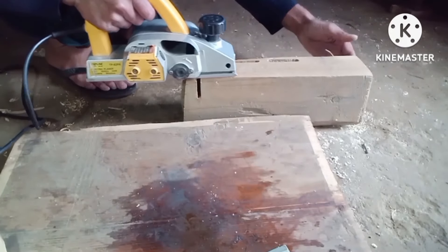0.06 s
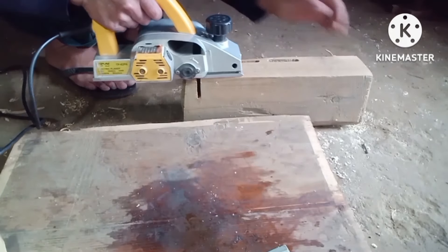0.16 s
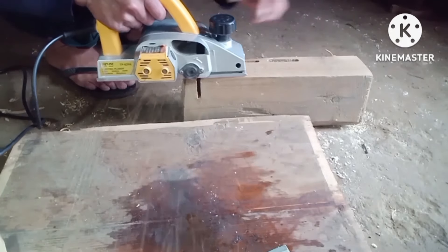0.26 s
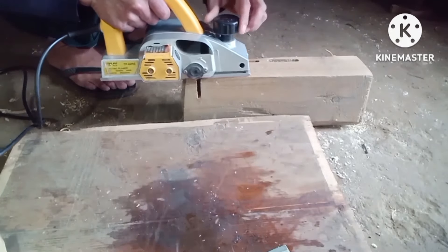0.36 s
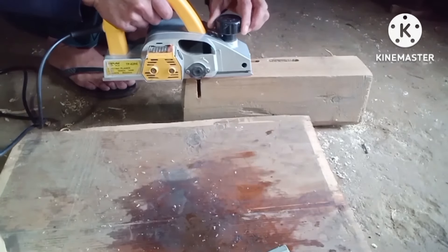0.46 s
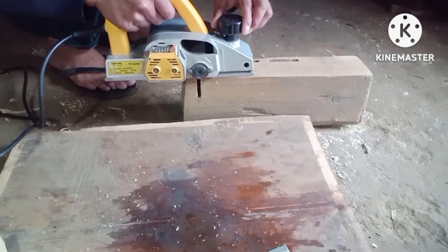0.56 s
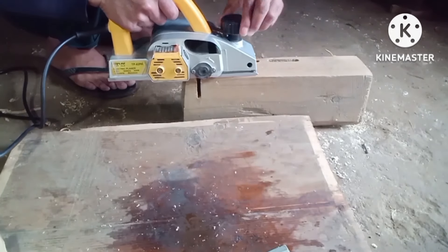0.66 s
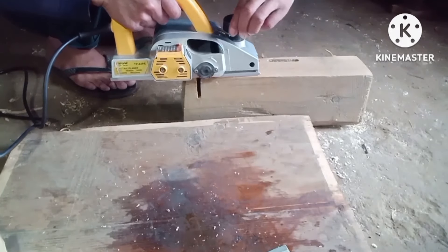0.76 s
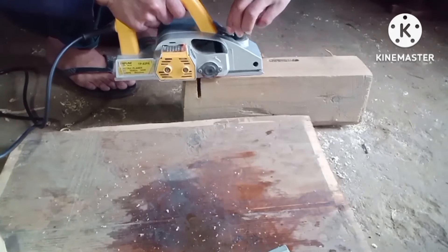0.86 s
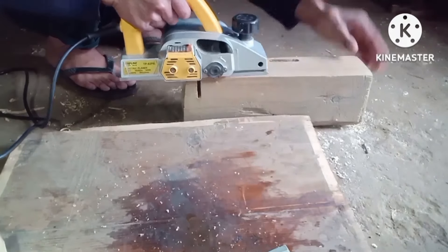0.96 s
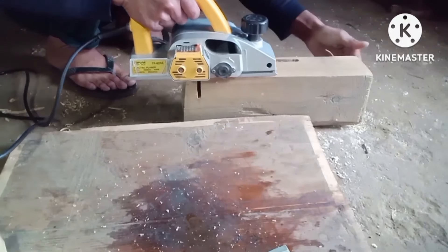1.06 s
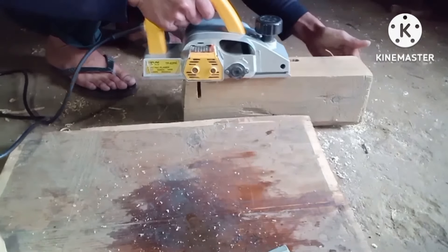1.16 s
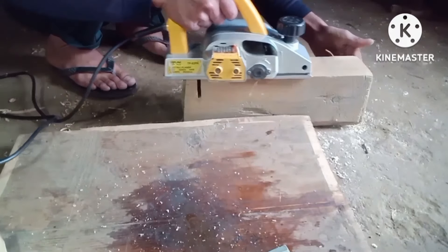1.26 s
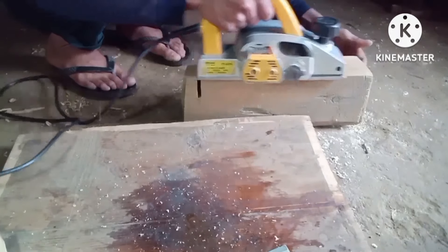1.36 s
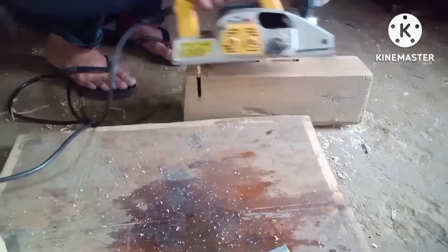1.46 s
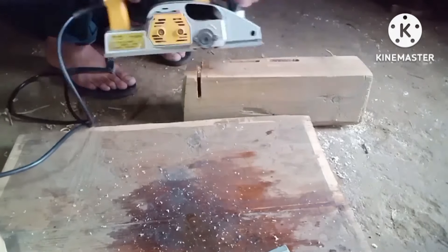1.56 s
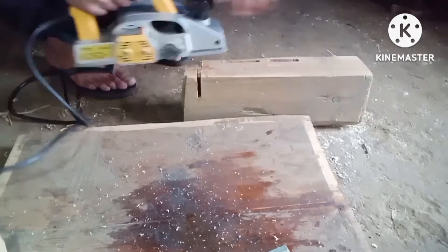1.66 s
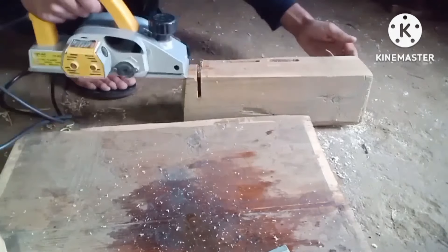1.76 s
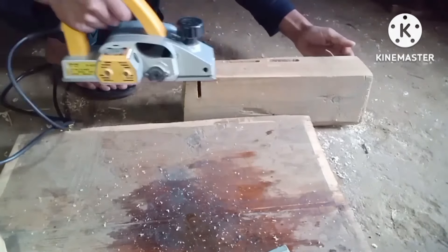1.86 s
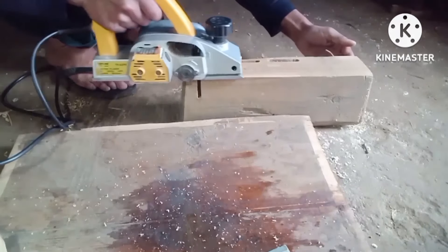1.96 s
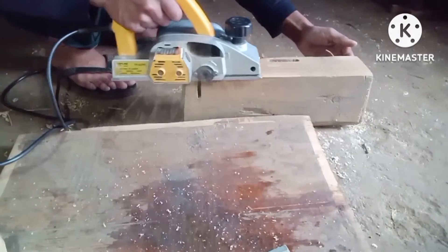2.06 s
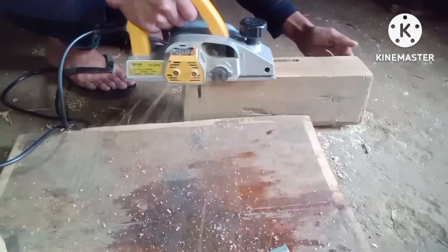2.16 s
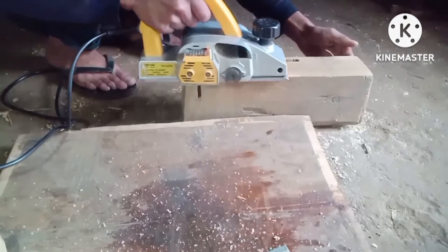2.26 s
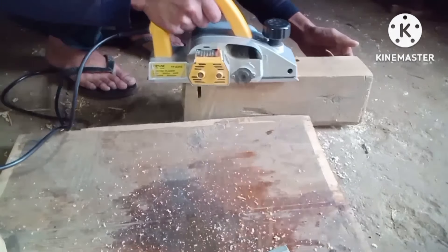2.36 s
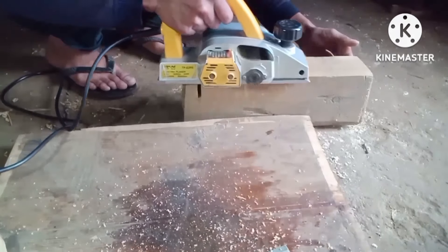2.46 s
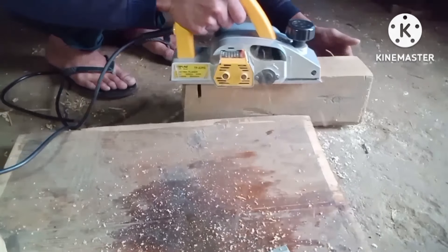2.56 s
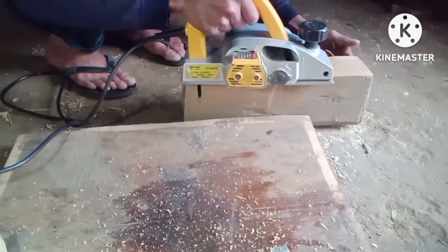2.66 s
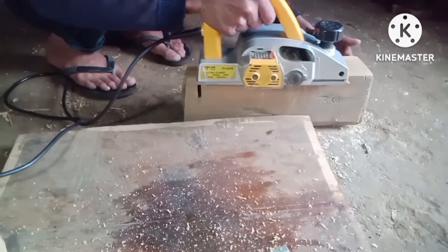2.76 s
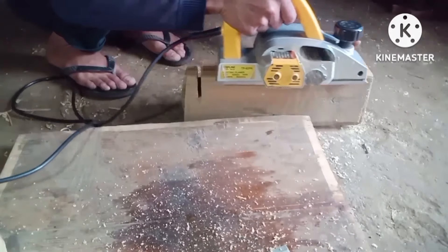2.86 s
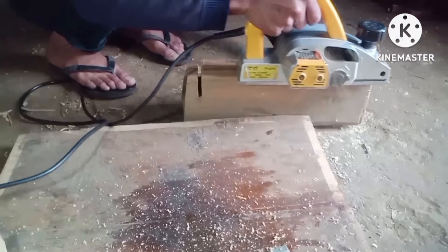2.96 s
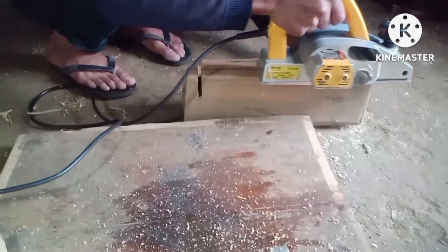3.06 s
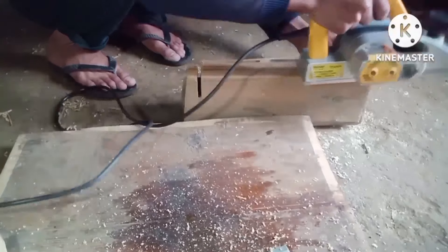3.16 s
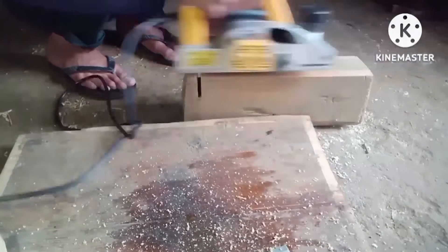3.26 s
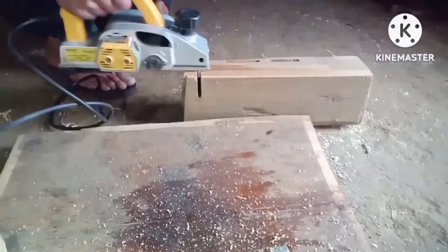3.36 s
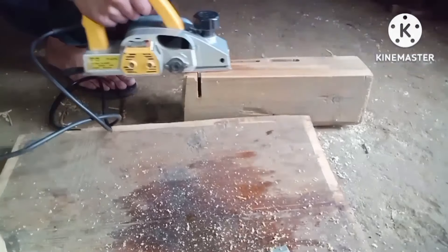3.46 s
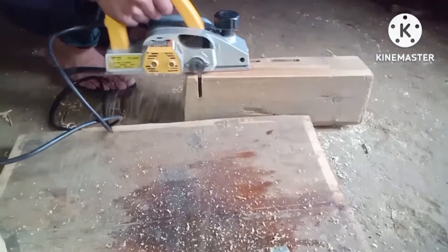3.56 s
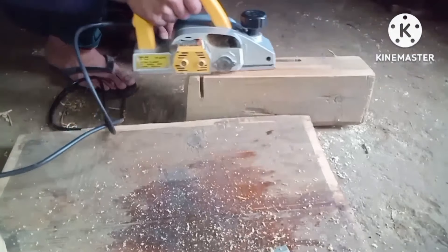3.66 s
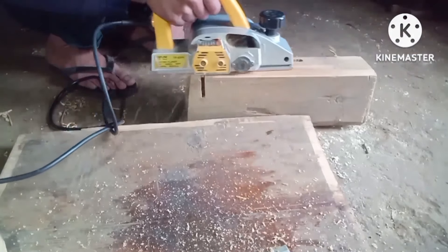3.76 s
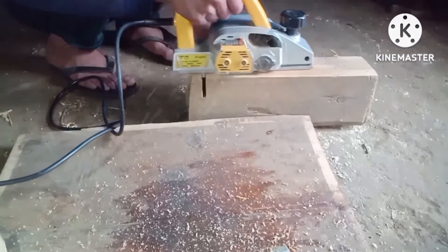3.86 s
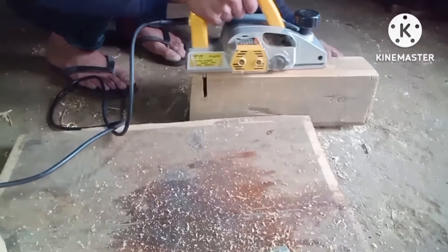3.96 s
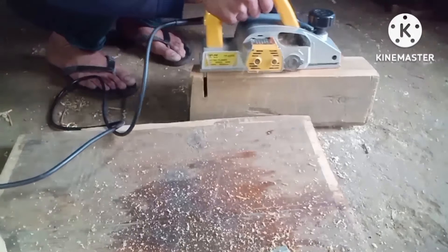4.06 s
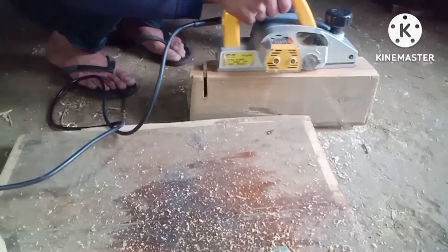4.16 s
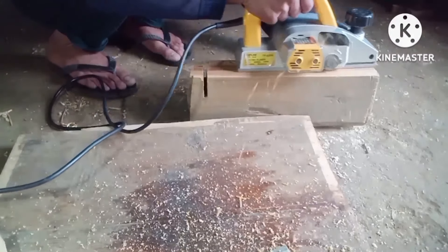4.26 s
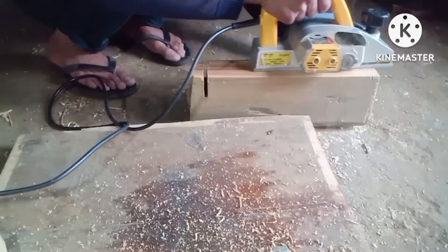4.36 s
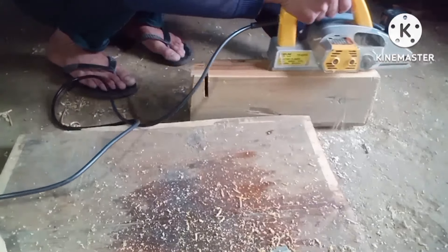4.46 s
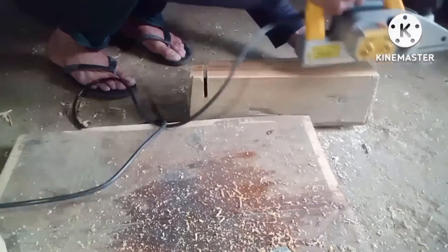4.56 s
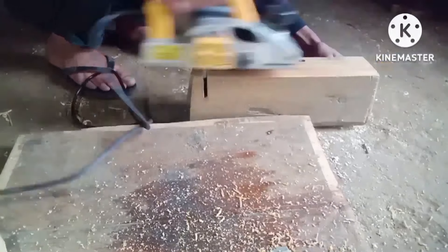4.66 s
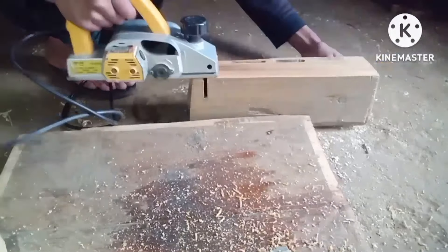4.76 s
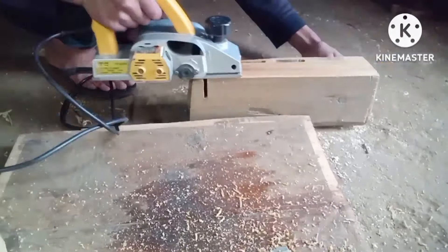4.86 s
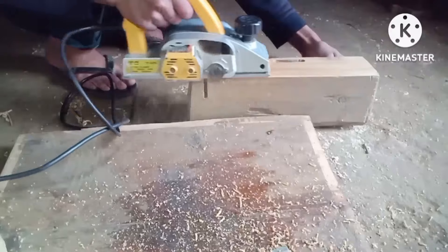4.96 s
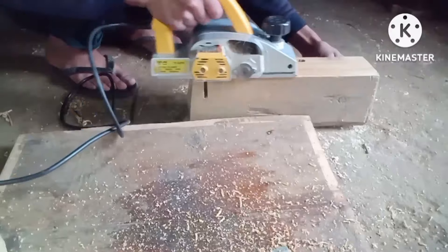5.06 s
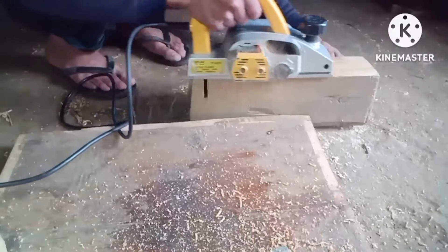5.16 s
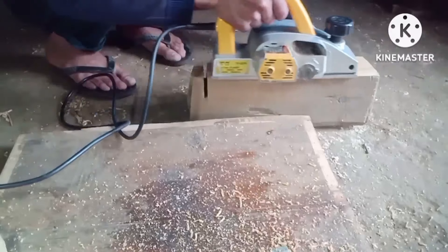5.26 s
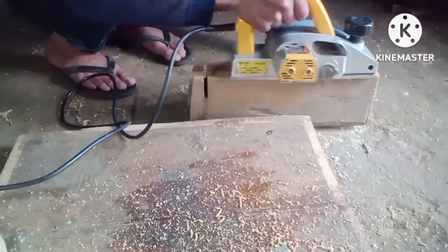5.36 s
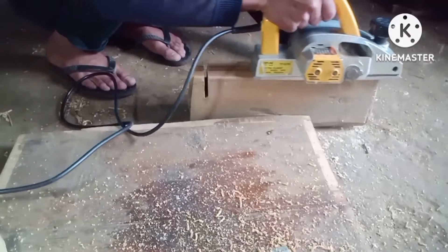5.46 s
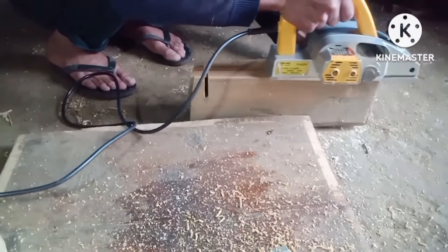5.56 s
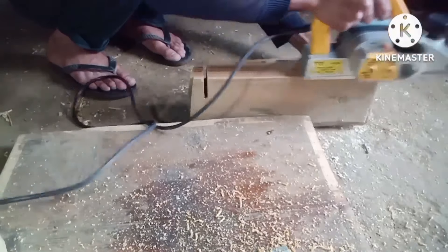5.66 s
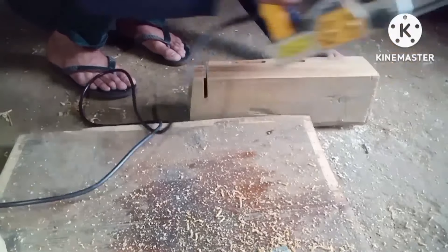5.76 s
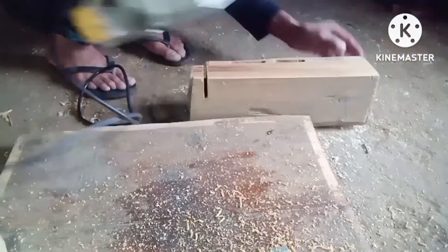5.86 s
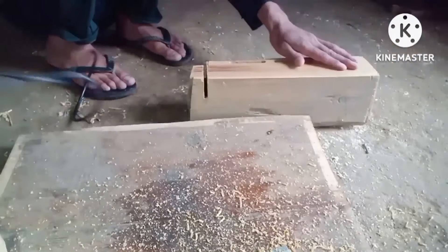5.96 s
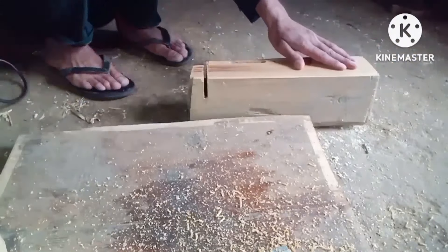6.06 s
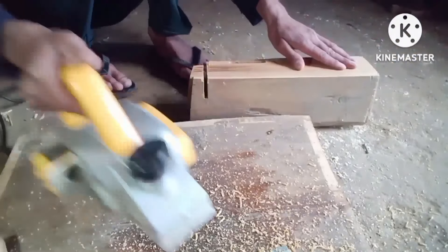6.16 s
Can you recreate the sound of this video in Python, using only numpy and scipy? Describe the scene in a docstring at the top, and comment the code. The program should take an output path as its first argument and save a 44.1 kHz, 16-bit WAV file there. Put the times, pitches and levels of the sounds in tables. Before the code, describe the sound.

In a small workshop, close to the microphone, an electric planer growls roughly at low speed, then switches suddenly to a loud high whine. Its blades chatter and rasp on a wooden block, the pitch sagging under load. It coasts down and spins up twice between passes, then dull chip knocks patter close by before a final coast-down. The sound is thin in the bass, with a short room reflection.

```python
"""Small workshop, close by: an electric hand planer shaves a wooden block. First a low growl; the scene then
changes abruptly to a high whine, which sags under the cut and coasts down three times. Tones are orders of the
motor shaft; wood, housing and fan noises are coloured noise tied to its turns. Blades chatter as they meet the
wood, then rasp; the block groans; chips knock near the microphone."""
import sys
import numpy as np
from scipy import signal
from scipy.fft import rfft, irfft, next_fast_len
from scipy.io import wavfile
from scipy.ndimage import uniform_filter1d, map_coordinates

SR = 44100
rng = np.random.default_rng(int(sys.argv[2]) if len(sys.argv) > 2 else 0)


def unload_audio(sound):
    """Save the sound as a 16-bit wav file, at the path given as the first command line argument."""
    columns = np.transpose(np.atleast_2d(sound))
    # keep every value between -1 and 1, then stretch to whole-number steps
    steps = np.round(np.clip(columns, -1, 1) * 32767)
    wavfile.write(sys.argv[1], SR, steps.astype(np.int16))


N = 273508
TIME = np.arange(N) / SR  # s


def undb(db):
    """Decibels to gain."""
    return 10 ** (np.asarray(db) / 20)


def curves(table):
    """Columns of a table, joined by straight lines in time."""
    time_s, *columns = np.transpose(table)
    return [np.interp(TIME, time_s, column) for column in columns]


def unit(x):
    """Scale to an rms of one."""
    return x / np.sqrt(np.mean(x ** 2) + 1e-18)


def walk(rate_hz):
    """Random levels held 1 / rate_hz seconds and smoothed twice; rms one."""
    held = rng.standard_normal(8000)[(TIME * rate_hz).astype(int) % 8000]
    width = max(int(SR / rate_hz), 1)
    return unit(uniform_filter1d(uniform_filter1d(held, width), width))


def colour(x, points):
    """Impose a spectrum of (freq_hz, gain_db) points, falling away beyond its ends; rms one."""
    hz, db = np.transpose(points)
    size = next_fast_len(N, real=True)
    f = np.arange(size // 2 + 1) * SR / size + 1
    ends = np.minimum(f / hz[0], 1) ** 2 * np.minimum(hz[-1] / f, 1) ** 2
    gain = ends * undb(np.interp(np.log(f), np.log(hz), db))
    return unit(irfft(rfft(x, size) * gain, size)[:N])


def gate(start_s, end_s, edge_s):
    """One between start and end; ramps of edge_s centred on both."""
    return np.clip(np.minimum(TIME - start_s, end_s - TIME) / edge_s + .5, 0, 1)


def shaft(hz, wobble):
    """Turns made by the shaft; belt and brushes make it waver a little."""
    return np.cumsum(hz) / SR + wobble * walk(87)


def line(turns, order, scatter, rate_hz):
    """One shaft order; a wandering share by another path beats with it and can cancel it."""
    angle = 2 * np.pi * order * turns - order ** 2 / 2  # the housing spreads each turn's pulse in time
    in_phase = (1 + scatter * walk(rate_hz)) * np.cos(angle)
    quadrature = scatter * walk(rate_hz) * np.sin(angle)
    return (in_phase + quadrature) / np.sqrt(.5 + scatter ** 2)


FADE_RATE_HZ = 22


def strong_lines(turns, levels, swells, scatter, fade, edge_s):
    """Main shaft orders, fading at random and moved to swell levels as the tool moves over the floor."""
    out = np.zeros(N)
    for order, steady_db in levels:
        gain = undb(steady_db) * np.abs(1 + fade * walk(FADE_RATE_HZ))
        for start_s, end_s, swell_order, swell_db in swells:
            if round(swell_order) == round(order):
                gain = gain + gate(start_s, end_s, edge_s) * (undb(swell_db) - gain)
        out += gain * line(turns, round(order), scatter, rate_hz=78)
    return out


def weak_lines(turns, table, scatter, rate_hz, gain_db):
    """Lesser shaft orders, fading at random and a little blurred in pitch."""
    return undb(gain_db) * sum(undb(db) * line(turns, order, scatter, rate_hz) for order, db in table)


def chatter(turns, hz, table, edge_s):
    """Blades hammer the edge of the block in step with the shaft and ring the sole plate."""
    out = np.zeros(N)
    orders = np.arange(1, 27)[:, None]
    for start_s, end_s, ring_hz, width_hz, db, odd_db in table:
        envelope = gate(start_s, end_s, edge_s)
        on = envelope > 0
        ring = 1 / (1 + (2 * (orders * hz[on] - ring_hz) / width_hz) ** 2)
        harmonics = ring * undb(odd_db * (orders % 2)) * np.sin(2 * np.pi * orders * turns[on])
        out[on] += undb(db) * envelope[on] * unit(harmonics.sum(axis=0))
    return out


def flicker(x, db, size=1024):
    """Narrow bands swell and fade on their own, a few hundredths of a second at a time."""
    z = signal.stft(x, nperseg=size)[2]
    patches = uniform_filter1d(rng.standard_normal(z.shape), 5, axis=0)
    patches = unit(uniform_filter1d(patches, 3, axis=1))
    return unit(signal.istft(z * undb(db * patches), nperseg=size)[1][:N])


def clatter(turns, memory, size=112):
    """Noise that nearly repeats from turn to turn, so it gathers on the shaft orders."""
    memory = np.clip(memory, 0, .9)
    rounds = signal.lfilter([1], [1, -memory], rng.standard_normal((4096, size)), axis=0)
    return unit(map_coordinates(rounds.ravel(), [(turns + 10) * size], order=3))


# noise spectra of block, cutting rasp, housing: freq_hz, gain_db
BLOCK_SPECTRUM = [(25, -4), (80, -13.5), (170, -12), (290, -12), (410, -4.5), (490, 1), (580, -2),
                  (700, -1.5), (1000, 0), (1500, 0.5), (3000, -12)]
RASP_SPECTRUM = [(600, -61), (1050, -15), (1430, 2.5), (1780, -5), (2050, 3.5), (2420, 4), (2630, 2.5),
                 (2830, 8), (3050, 4.5), (3550, 6.5), (3900, -1.5), (4600, -17), (7000, -65)]
HOUSING_SPECTRUM = [(2500, -33), (4200, 2), (5300, 2), (6400, 2.5), (7300, -14.5), (8600, -6), (11000, -25)]


def noises(turns, strokes, levels, air_colour, memory, grain_db, bite, patchy_db,
           rumble_db, rasp_db, hiss_db, air_db):
    """Blade strokes tear fibres and shake the block; air rushes through fan and housing."""
    block_level, rasp_level, hiss_level, air_level = levels
    pulse = np.exp(np.clip(bite, 0, 3) * np.cos(2 * np.pi * strokes))
    tearing = pulse * undb(grain_db * walk(700) + 2.14 * walk(50))
    white = rng.standard_normal((3, N))
    rumble = flicker(colour(white[0] * tearing, BLOCK_SPECTRUM), patchy_db)
    rasp = flicker(colour(clatter(turns, 0.23) * tearing, RASP_SPECTRUM), patchy_db)
    wood = undb(block_level + rumble_db) * rumble + undb(rasp_level + rasp_db) * rasp
    hiss = colour(clatter(turns, memory) + 0.95 * white[1], HOUSING_SPECTRUM)
    air = flicker(colour(clatter(turns, memory) + 1.2 * white[2], air_colour), db=4.5)
    return wood + undb(hiss_level + hiss_db) * hiss + undb(air_level + air_db) * air


# low-speed shaft: time_s, shaft_hz
GROWL_SPEED = [(0.01, 293.9), (0.15, 304.1), (0.3, 306.2), (0.41, 304.6), (0.5, 306.7), (0.55, 309.8),
               (0.62, 311), (0.66, 313.3), (0.69, 310.7)]
# strong lines: shaft_order, level_db
GROWL_LINES = [(2, -54), (3, -35), (4, -38), (6, -48), (8, -39.5), (14, -47)]
# weak lines, before gain_db: shaft_order, relative_db
GROWL_WEAK = [(.5, -60), (1, -47), (5, -51), (10, -43), (12, -48), (13, -52), (15, -49), (16, -49),
              (17, -44), (18, -49), (19, -51), (20, -46), (21, -51), (29, -55), (35, -51), (37, -48),
              (39, -49)]
# one line rings out: start_s, end_s, shaft_order, level_db
GROWL_SWELLS = [(-.05, 0.13, 4, -20), (.14, 0.305, 4, -21.5), (0.307, 0.54, 4, -26.5), (-.05, 0.19, 6, -34),
                (0.013, 0.268, 2, -27.5), (0.322, 0.4, 14, -29.5), (0.462, 0.667, 3, -24.5),
                (.49, 0.741, 6, -27.5), (.49, .63, 2, -30), (0.502, .72, 8, -36)]
# blade chatter: start_s, end_s, ring_hz, width_hz, level_db, odd_orders_db
GROWL_CHATTER = [(0.285, 0.389, 2440, 480, -19, 0), (0.392, 0.459, 2260, 504, -23, -2)]
# noise levels before offsets: time_s, block_rumble_db, cutting_rasp_db, housing_hiss_db, fan_air_db
GROWL_NOISE = [(0.01, -39.5, -42, -41, -35.5), (0.2, -39, -28.5, -40.5, -40), (0.27, -42, -59, -41.5, -38),
               (0.3, -47, -35.5, -41, -42), (0.49, -42, -41, -45.5, -45.5), (0.57, -35, -44, -46, -37.5),
               (0.691, -32.5, -59, -46.5, -39.5)]
# fan air spectrum: freq_hz, gain_db
GROWL_AIR = [(6000, -32), (8000, -28), (9000, -15), (10200, -8), (11200, 3), (12100, 2), (12900, -10),
             (14000, -9), (15500, -28)]


def growl():
    """Low speed: shaft orders and chatter under a random rattle, plus noise pulsing once a turn."""
    hz = curves(GROWL_SPEED)[0]
    turns = shaft(hz, wobble=0.0013)
    weak = weak_lines(turns, GROWL_WEAK, scatter=.6, rate_hz=35, gain_db=-1.5)
    rattle = undb(1.1 * walk(260))
    strong = strong_lines(turns, GROWL_LINES, GROWL_SWELLS, scatter=0.087, fade=0.36, edge_s=0.12)
    tones = rattle * (strong + weak + chatter(turns, hz, GROWL_CHATTER, edge_s=0.057))
    rush = noises(turns, turns, curves(GROWL_NOISE), GROWL_AIR, memory=0.9, grain_db=1, bite=0.56,
                  patchy_db=2.5, rumble_db=2.0, rasp_db=-3.5, hiss_db=9.5, air_db=3.5)
    return tones + rush


# shaft with the sole on the end of the block, then in three passes: time_s, shaft_hz
REST_SPEED = [(0.72, 425.6), (0.74, 423.4), (1.052, 423.5), (1.28, 428.5), (1.49, 425.3)]
PASS_1_SPEED = [(2.039, 405.6), (2.13, 398.5), (2.271, 376), (2.34, 371.3), (2.52, 377.2), (2.69, 393.4),
                (2.91, 398.6), (3.0, 392.8), (3.101, 390.2), (3.272, 409.2)]
PASS_2_SPEED = [(3.61, 403.3), (3.71, 407.6), (3.76, 398.8), (3.87, 398.3), (4.09, 399), (4.239, 396),
                (4.48, 382.1), (4.63, 382.6)]
PASS_3_SPEED = [(4.72, 409.6), (4.79, 420.8), (4.91, 432), (4.97, 434.7), (5.151, 402), (5.26, 384),
                (5.479, 394.8), (5.592, 392.6), (5.76, 399.2)]
# trigger let go and pulled again: release_s, pull_s
TRIGGER = [(1.501, 1.815), (3.278, 3.422), (5.767, 7)]
# unloaded speed; time constants of spin-up and air drag; bearing friction as an added speed
FREE_HZ, SPIN_UP_S, COAST_S, FRICTION_HZ = 436, .113, .7, 150.6


def speed():
    """Shaft follows the load, coasts under drag and friction on release, spins up on pull."""
    hz = curves(np.vstack([REST_SPEED, PASS_1_SPEED, PASS_2_SPEED, PASS_3_SPEED]))[0]
    for release_s, pull_s in TRIGGER:
        coasting_s = np.clip(TIME - release_s, 0, pull_s - release_s)
        start_hz = np.interp(release_s, TIME, hz)
        coast = (start_hz + FRICTION_HZ) * np.exp(-coasting_s / COAST_S) - FRICTION_HZ
        free = FREE_HZ + (coast - FREE_HZ) * np.exp(-np.maximum(TIME - pull_s, 0) / SPIN_UP_S)
        hz = np.where(TIME > release_s, np.minimum(hz, free), hz)
    return hz


# pass posture (a row ending before it starts adds nothing): start_s, end_s
PASSES = [(2.13, 3.24), (3.7, 5.2), (5.049, 5)]
REST_END_S = 1.562  # sole first leaves the block


def contact():
    """Shares of three postures: resting on the block, in a pass, lifted."""
    resting = gate(-1, REST_END_S, edge_s=0.096)
    passing = sum(gate(start_s, end_s, edge_s=0.043) for start_s, end_s in PASSES)
    return resting, passing, 1 - resting - passing


# strong lines by posture: shaft_order, resting_db, passing_db, lifted_db
WHINE_LINES = [(2, -52, -56, -52.5), (4, -43, -46.5, -44), (8, -39.5, -43, -41), (12, -42.5, -49, -42.5),
               (16, -41.5, -47.5, -51), (20, -42, -55, -50), (24, -35, -41.5, -44), (28, -35.5, -39.5, -52)]
LIFTED_POWER = 0.66  # off the wood, lines grow with this power of the speed


def whine_levels(hz):
    """Level of each strong line (order, dB), set by posture and, when lifted, speed."""
    resting, passing, lifted = contact()
    slow_db = LIFTED_POWER * 20 * np.log10(hz / np.median(hz))
    return [(order, resting * rest_db + passing * pass_db + lifted * (lift_db + slow_db))
            for order, rest_db, pass_db, lift_db in WHINE_LINES]


# blades bite the wood, levels before offsets: start_s, end_s, block_rumble_db, cutting_rasp_db
BITES = [(0.689, 1.426, -55.5, -35), (0.996, 1.145, -51, -31), (1.426, 1.497, -48, -35.5),
         (1.917, 2.048, -60.5, -33), (2.127, 2.158, -47, -28), (2.32, 2.443, -47.5, -39),
         (2.583, 2.71, -52.5, -37.5), (3.176, 3.258, -58, -42), (3.685, 3.758, -51, -25.5),
         (3.82, 4.065, -54, -32), (4.239, 4.317, -60, -34), (4.861, 4.967, -55.5, -31),
         (5.041, 5.171, -52.5, -30), (5.722, 5.759, -60, -33.5), (5.9, 5.981, -60, -49)]
# treble base level, for fan air and scream: time_s, level_db
AIR_LEVEL = [(0.72, -40), (0.84, -31), (1.28, -36), (1.31, -33.5), (1.69, -37), (1.79, -31), (2.07, -35.5),
             (2.47, -33), (2.55, -31), (3.16, -38.5), (3.19, -36.5), (3.93, -35), (5.2, -40), (5.37, -34),
             (5.4, -38.5), (5.87, -35.5), (5.99, -31.5), (6.19, -33.5)]
# steady levels at FREE_HZ, before the offsets in whine()
RUMBLE_DB, RASP_DB, LIFTED_RUMBLE_DB, LIFTED_RASP_DB = -60, -41, -58.5, -44
HISS_DB, REST_HISS_DB = -45, 4  # housing hiss; its rise while resting
CHATTER_HISS_DB, CUT_HISS_DB = -16, -13.5  # hiss against chatter; shavings hiss against rasp
AIR_DB, SLOW_AIR_DB = -0.5, 6  # air against AIR_LEVEL; its rise towards standstill


def noise_levels(hz, away_db):
    """Rumble, rasp, hiss follow speed and bite; air rises as the shaft slows (all dB)."""
    resting, _, lifted = contact()
    slow_db = 20 * np.log10(hz / FREE_HZ) + away_db
    block = RUMBLE_DB + lifted * (LIFTED_RUMBLE_DB - RUMBLE_DB) + slow_db + 0.83 * walk(18)
    rasp = RASP_DB + lifted * (LIFTED_RASP_DB - RASP_DB) + slow_db
    for start_s, end_s, block_db, rasp_db in BITES:
        bite = gate(start_s, end_s, edge_s=0.015)
        block = block + bite * (block_db - block)
        rasp = rasp + bite * (rasp_db - rasp)
    shaken = sum(undb(db + CHATTER_HISS_DB) * gate(start_s, end_s, edge_s=0.01)
                 for start_s, end_s, _, _, db, _ in WHINE_CHATTER)
    steady = undb(HISS_DB + REST_HISS_DB * resting + slow_db)
    shavings = undb(rasp + CUT_HISS_DB)
    hiss = 20 * np.log10(np.sqrt(steady ** 2 + shaken ** 2 + shavings ** 2))
    air = curves(AIR_LEVEL)[0] + AIR_DB + SLOW_AIR_DB * (1 - hz / FREE_HZ)
    return block, rasp, hiss, air


def room(x, wet_db, t60_s):
    """Floor and walls return the sound a moment late, so gliding lines smear and beat."""
    t = np.arange(SR // 2) / SR
    tail = rng.standard_normal(len(t)) * undb(-60 * t / t60_s) * (t > .004)
    wet = signal.fftconvolve(x, tail / np.linalg.norm(tail))[:N]
    return (x + undb(wet_db) * wet) / np.hypot(1, undb(wet_db))


# block groans as the sole drags over it: start_s, end_s, pitch_hz, level_db
GROANS = [(1.12, 1.36, 436, -56), (1.422, 1.474, 562.5, -40), (1.878, 1.927, 593, -42),
          (2.573, 2.701, 642, -50), (4.056, 4.156, 404.5, -51.5), (5.379, 5.404, 562, -44)]


def groans(width_hz):
    """Stick and slip keeps one block resonance going: a narrow band of noise."""
    out = np.zeros(N)
    for start_s, end_s, hz, db in GROANS:
        band = [(hz - width_hz, -30), (hz, 0), (hz + width_hz, -30)]
        out += undb(db) * gate(start_s, end_s, edge_s=0.024) * colour(rng.standard_normal(N), band)
    return out


# one line rings out as the tool moves: start_s, end_s, shaft_order, level_db
WHINE_SWELLS = [(.73, 1.066, 8, -29.5), (0.743, 0.998, 4, -31.5), (0.875, 1.023, 16, -32),
                (0.885, 1.076, 12, -29.5), (1.05, 1.322, 24, -26.5), (1.139, 1.415, 8, -22.5),
                (1.418, 1.473, 24, -23.5), (1.498, 1.572, 8, -29), (1.555, 1.64, 4, -27),
                (1.58, 1.627, 12, -26), (1.85, 1.948, 8, -30.5), (1.902, 2.032, 4, -23.5),
                (1.904, 2.043, 12, -32), (1.95, 2.031, 8, -21), (2.135, 2.295, 16, -33),
                (2.156, 2.236, 8, -32), (2.2, 2.317, 20, -38), (2.178, 2.34, 28, -35),
                (2.53, 2.648, 24, -30), (2.625, 2.769, 8, -35), (2.82, 3.138, 28, -31.5),
                (2.964, 3.138, 12, -38), (3.166, 3.313, 8, -28.5), (3.35, 3.532, 8, -31.5),
                (3.319, 3.429, 12, -29.5), (2.852, 2.93, 2, -46), (3.027, 3.178, 4, -38.5),
                (3.29, 3.628, 4, -34), (3.542, 3.685, 8, -28), (3.972, 4.372, 2, -46),
                (4.108, 4.222, 8, -29.5), (4.287, 4.329, 8, -25.5), (4.314, 4.607, 28, -28.5),
                (4.363, 4.655, 4, -40.5), (4.427, 4.642, 20, -36.5), (4.648, 4.879, 12, -36),
                (4.73, 4.784, 8, -21.5), (4.817, 4.915, 4, -30), (4.909, 5.004, 8, -26),
                (5.057, 5.142, 24, -25.5), (5.17, 5.231, 28, -30.5), (5.306, 5.419, 8, -29.5),
                (5.593, 5.747, 28, -27.5), (5.38, 5.545, 28, -28.5), (5.394, 5.487, 16, -31.5),
                (5.742, 5.915, 8, -33), (5.768, 5.859, 4, -34), (5.79, 5.86, 12, -30)]
# blade chatter on the block edge: start_s, end_s, ring_hz, width_hz, level_db, odd_orders_db
WHINE_CHATTER = [(0.716, 0.892, 2300, 697, -29, -3.5), (1.963, 2.051, 2430, 600, -29.5, -31),
                 (1.969, 2.002, 5920, 1200, -21.5, -11), (2.036, 2.102, 6120, 1290, -20.5, -5),
                 (3.568, 3.697, 2314, 591, -30, -13), (3.599, 3.67, 6390, 2000, -21, -33),
                 (4.978, 5.029, 6530, 1483, -23, -7)]
# weak lines before gain_db, fractional ones from belt, drum, bearings: shaft_order, relative_db
WHINE_WEAK = [(1, -67), (1.3, -64), (3, -60), (3.25, -56), (5, -53), (6, -50), (7, -54), (9, -55),
              (10, -59), (14, -57), (18, -61), (22, -55), (26, -55)]
# thin scream of commutator and bearings: shaft_order, relative_db
SCREAM = [(29.1, -5), (30, -10), (32, -3), (33, -12), (34.17, -1), (35.2, -8), (36, -5), (38, -8), (40, -7),
          (42, -10), (44, -7), (48, -6), (52, -6), (58, -6), (64, -6)]
# spectrum of fan air and scream: freq_hz, gain_db
WHINE_AIR = [(5800, -26), (7200, -3), (8300, -7), (9500, 2.5), (11000, -4.5), (12200, 7.5), (13500, 0),
             (14500, 11), (15500, -24)]
SCREAM_DB = 1.5  # against the air of noise_levels()
FADE_DEPTH = 0.73  # random fading of strong lines
AWAY_S, AWAY_DB_PER_S = 5.928, 45  # tool carried off: strong lines and steady noise fade


def whine():
    """High speed: shaft orders, scream, chatter, noise and groans; sags under the cut, coasts on release."""
    hz = speed()
    turns = shaft(hz, wobble=0.0008)
    away_db = -AWAY_DB_PER_S * np.maximum(TIME - AWAY_S, 0)
    levels = noise_levels(hz, away_db)
    strokes = 1.3 * turns
    force = (hz / np.median(hz)) ** 2  # unbalance grows with the square of the speed
    # speed changing fast: tool off the wood, more of the room heard
    lift = np.clip(uniform_filter1d(np.abs(np.gradient(hz)) * SR, SR // 10) / 500, 0, 1)
    scatter = .38 + .45 * lift
    strong = strong_lines(turns, whine_levels(hz), WHINE_SWELLS, scatter, FADE_DEPTH, edge_s=0.044)
    direct = undb(away_db) * strong + chatter(turns, hz, WHINE_CHATTER, edge_s=.012)
    # lesser lines leave through the vents and arrive mostly by way of the floor
    weak = weak_lines(turns, WHINE_WEAK, scatter=1.2, rate_hz=22, gain_db=-3)
    hum = force * (1 - .6 * lift) * weak
    scream_lines = weak_lines(turns, SCREAM, scatter=.7, rate_hz=25, gain_db=0)
    scream = undb(levels[-1] + SCREAM_DB) * colour(scream_lines, WHINE_AIR)
    reflected = room(direct, wet_db=-16 + 9 * lift, t60_s=.22)
    reflected = reflected + room(hum + (1 - .4 * lift) * scream, wet_db=-1, t60_s=.25)
    rush = noises(turns, strokes, levels, WHINE_AIR, memory=.35, grain_db=2.0, bite=0.63,
                  patchy_db=5.0, rumble_db=3.5, rasp_db=-1.5, hiss_db=-4.0, air_db=-1)
    return reflected + rush + groans(width_hz=46)


# chips knocking near the microphone: start_s, level_db, start_pitch_hz
CHIPS = [(2.056, -36, 448.4), (2.137, -33, 474), (3.752, -28.5, 523), (5.033, -29.5, 604),
         (5.0455, -27, 608), (5.0666, -37.5, 650), (5.076, -21, 601), (5.1215, -19.5, 613),
         (5.15, -14.5, 683), (5.162, -24, 680), (5.166, -35, 791), (5.1822, -24, 580.7), (5.1963, -20, 668),
         (5.2, -17, 820), (5.2149, -17.5, 632), (5.2936, -25, 693)]


def chips(cycles, sag_s):
    """Each chip gives a dull pop of a cycle or two that drops in pitch."""
    out = np.zeros(N)
    t = np.arange(SR // 50) / SR
    for start_s, db, hz in CHIPS:
        phase = hz * sag_s * np.log1p(t / sag_s)
        swell = hz * t / cycles
        i = int(start_s * SR)
        out[i:i + len(t)] -= undb(db) * swell * np.exp(1 - swell) * np.sin(2 * np.pi * phase)
    return signal.sosfilt(signal.butter(2, 260, "highpass", fs=SR, output="sos"), out)


CHANGE_S = .707  # growl gives way to whine


def scene():
    """Growl, then whine, with the chips on top."""
    fast = gate(CHANGE_S, np.inf, edge_s=0.0018)
    planer = (1 - fast) * growl() + fast * whine()
    return (planer + chips(cycles=0.24, sag_s=0.0057))[None]


TOP_HZ = 15420


def record(dry):
    """The phone thins the bass and cuts the top."""
    thin = signal.sosfilt(signal.butter(1, 170, "highpass", fs=SR, output="sos"), dry)
    return signal.sosfilt(signal.ellip(12, .2, 80, TOP_HZ, fs=SR, output="sos"), thin)


dry = scene()
out = record(dry)
unload_audio(out)
```